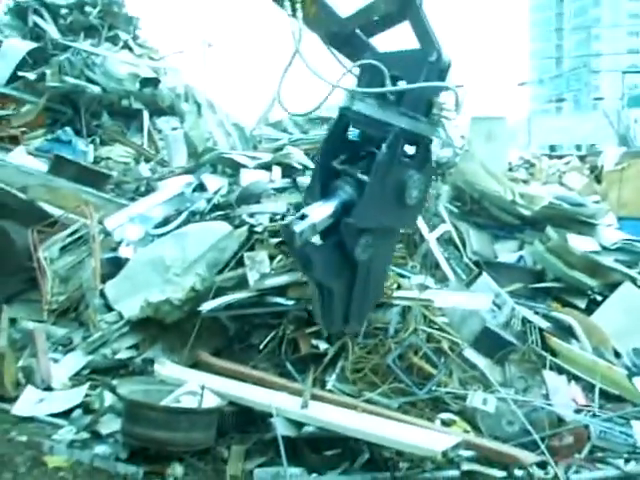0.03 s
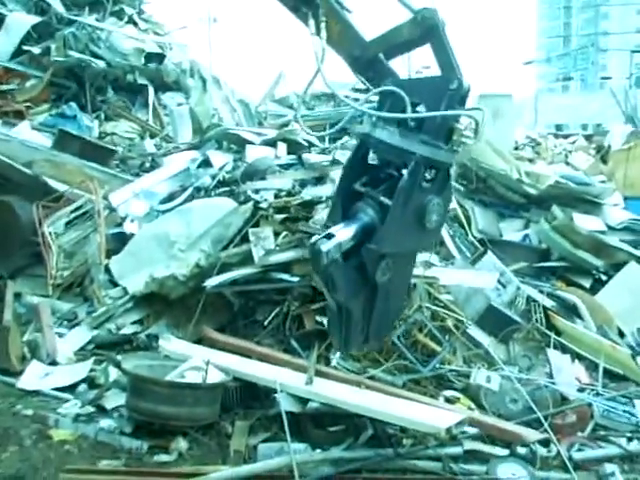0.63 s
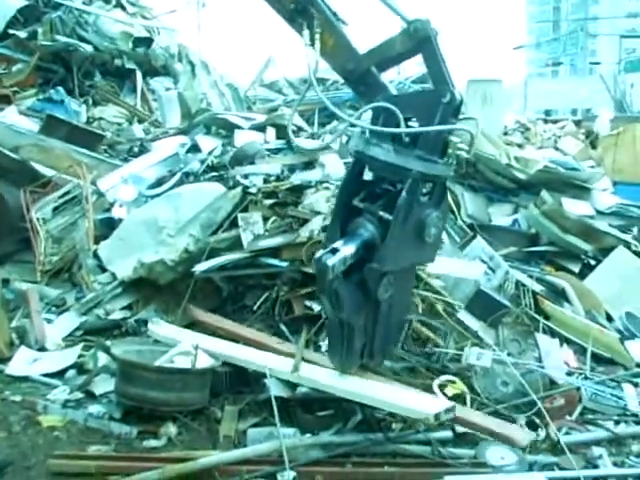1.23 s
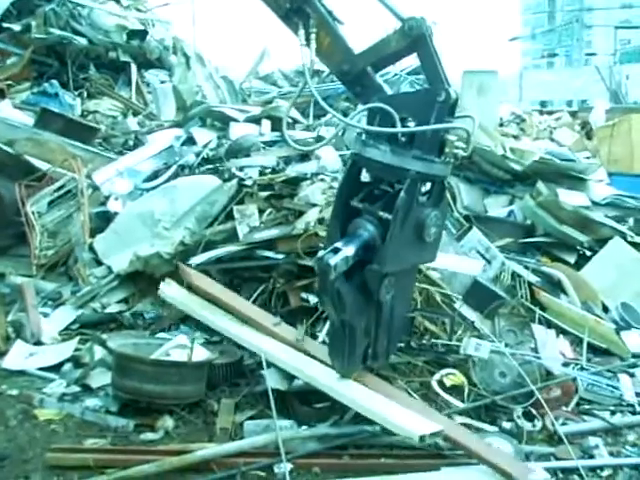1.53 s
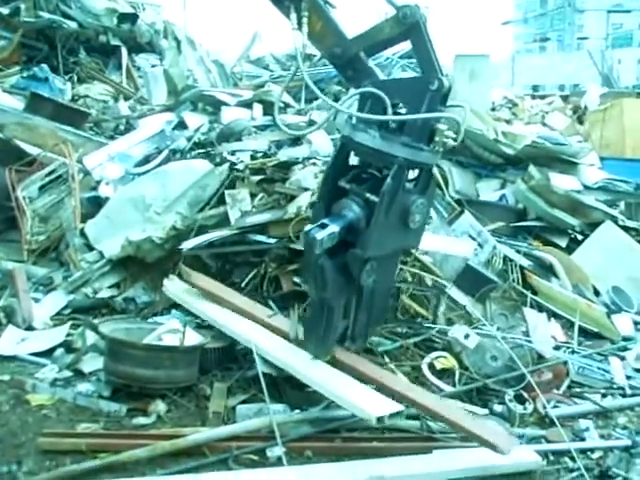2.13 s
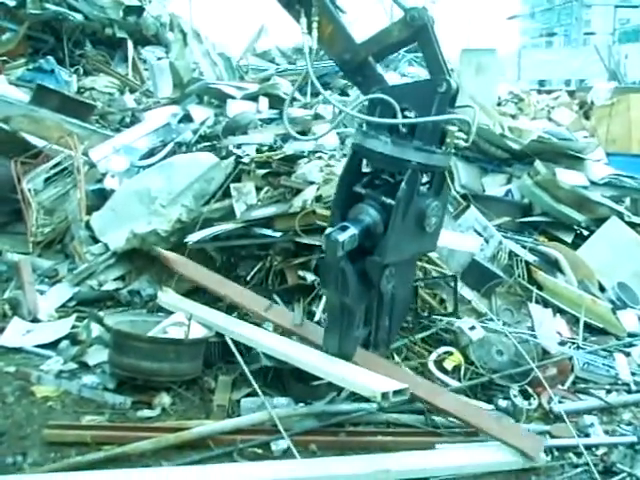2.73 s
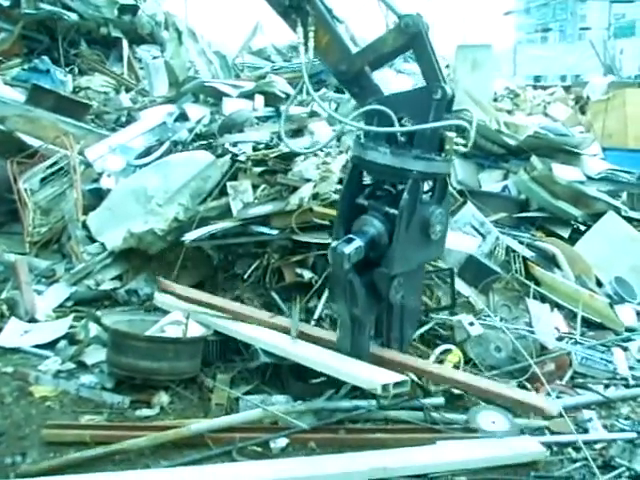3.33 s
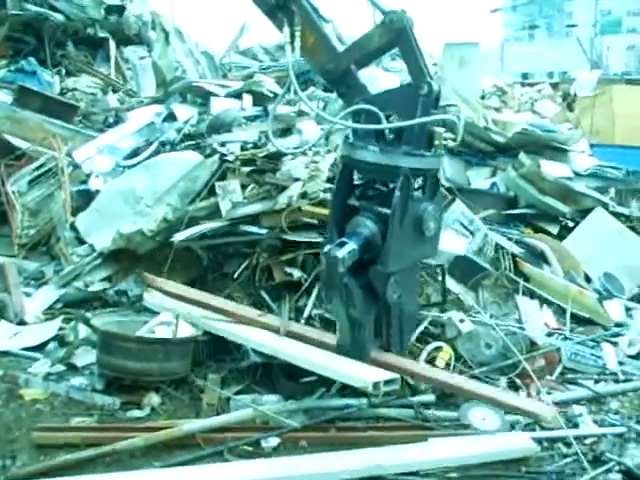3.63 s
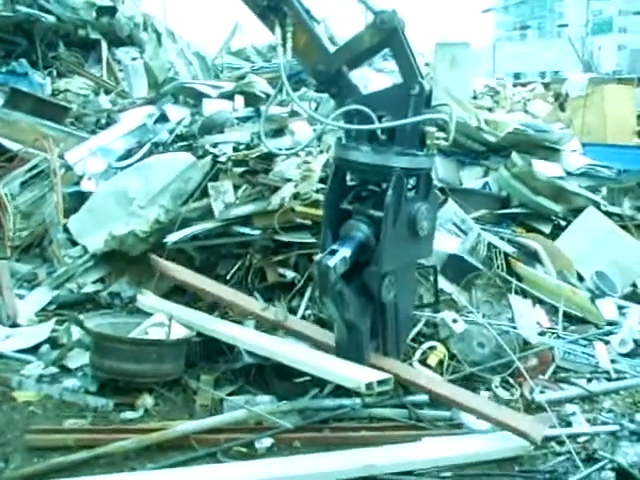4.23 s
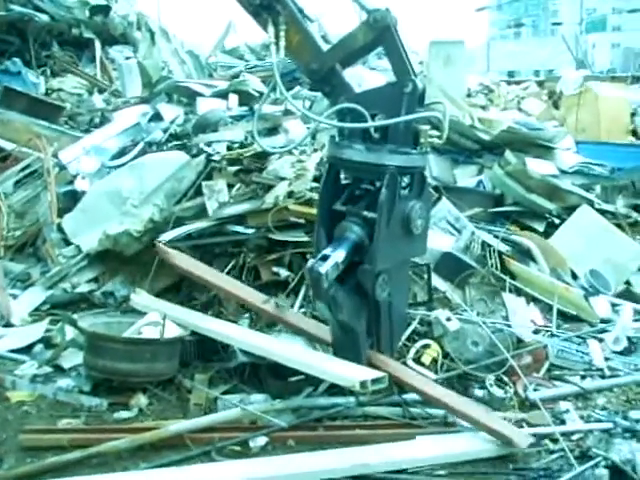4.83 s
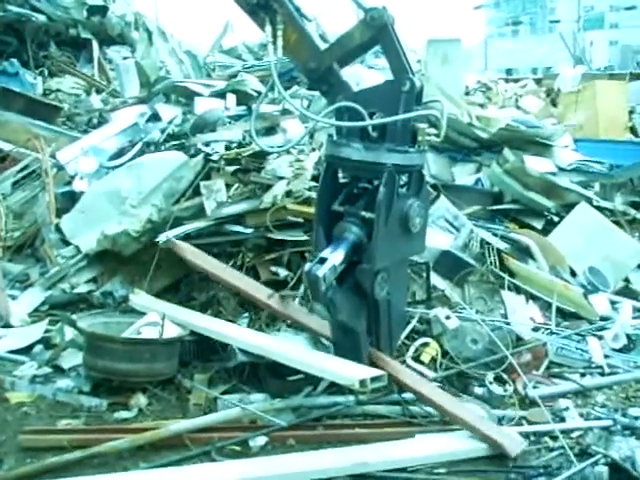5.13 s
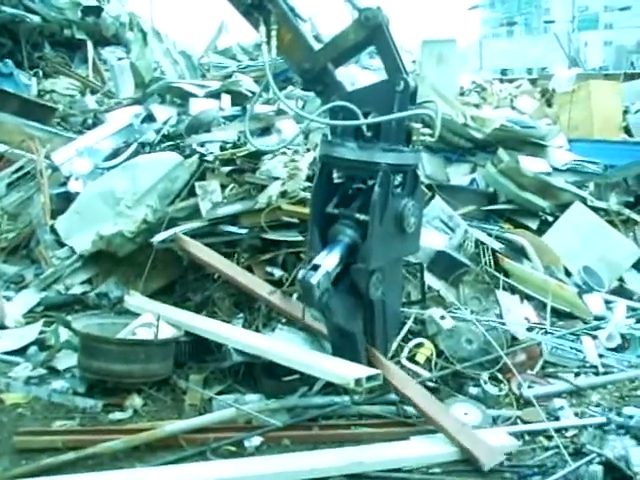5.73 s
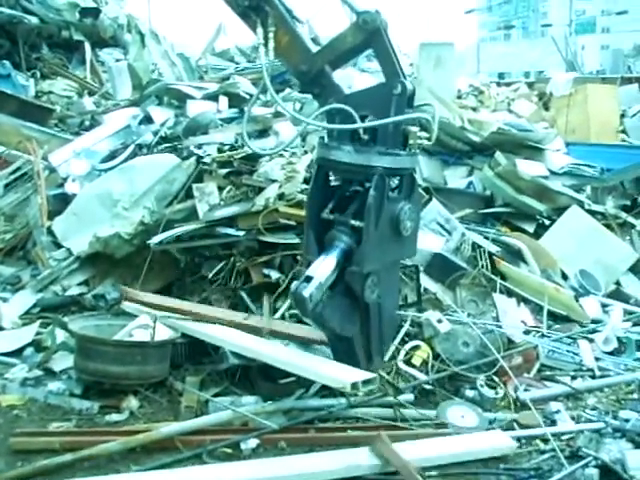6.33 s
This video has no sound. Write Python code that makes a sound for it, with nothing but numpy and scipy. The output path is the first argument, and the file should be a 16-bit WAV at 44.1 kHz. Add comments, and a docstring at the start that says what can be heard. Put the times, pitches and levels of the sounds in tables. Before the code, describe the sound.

An excavator's diesel engine runs steadily in a scrap yard while its hydraulic shear roots through a heap of steel. The pump whines as small pieces scrape and clank, then a hollow tube chatters and rings. The clatter eases and the hydraulics sing through a long squeeze, with light wind buffeting the microphone. Heavy steel bars crash and ring near the end, slightly overloading the recording.

```python
"""An excavator's hydraulic shear roots through scrap steel while its diesel engine runs throughout.
First the pump whines, small pieces scrape and clank, and a light steel channel crashes at 1.1 s.
From 2.7 s a hollow tube chatters and rings. After 3 s wind starts to buffet the microphone, and oil
sings in the valves during one long squeeze. Tube and channel crash at 5.4 s, and a long beam joins them
at 6 s. The microphone misses the highest treble and overloads on the heavy crashes."""
import sys
import numpy as np
from scipy import signal
from scipy.fft import rfft, irfft, next_fast_len
from scipy.io import wavfile

SR = 44100
rng = np.random.default_rng(int(sys.argv[2]) if len(sys.argv) > 2 else 0)


def to_wav(s):
    """Save 16-bit WAV."""
    ch = np.atleast_2d(s).T  # columns
    pcm = np.round(np.clip(ch, -1, 1) * 32767)  # PCM
    wavfile.write(sys.argv[1], SR, pcm.astype(np.int16))


N = 289737
TIME = np.arange(N) / SR
HIT_TIME = np.arange(SR * 2 // 3) / SR  # seconds since a hit began
MIC_EDGE_HZ = 6270  # the microphone picks up little above this

# How fast the engine runs. Each row: time in seconds, firings per second.
FIRING_RATE = [(0, 98.3), (0.3, 92.24), (0.9, 92.54), (1.5, 93.5), (2.3, 95.9), (2.85, 92.7), (3.1, 93.6),
               (3.3, 99), (3.7, 97.3), (4.2, 101.3), (5.3, 98.5), (6.57, 95.4)]
# The tones of the exhaust. Each row: multiple of the firing rate, relative level in dB.
EXHAUST_TONES = [(1, 0), (2, -16), (3, -19.5), (4, -15), (5, -16), (6, -17), (7, -24.5), (8, -18),
                 (9, -19.5), (10, -17)]
# The roar of fan and machine. Each row: frequency in Hz, relative level in dB.
ROAR_COLOUR = [(25, -12.5), (60, 0), (130, -6), (210, 2), (330, -1.5), (520, -5.5), (850, -4), (1500, -8),
               (2200, -7), (3200, -14), (4500, -22), (6200, -20)]
# The tones of the pump, then of the valves: multiples of the firing rate, and their relative levels in dB.
PUMP_MULTIPLES = [4, 5, 7]
PUMP_LEVELS = [-3, -6, 3]
VALVE_MULTIPLES = [20, 21, 22]
VALVE_LEVELS = [0.5, -3.5, -1.5]
# Gusts of wind. Each row: time of the peak in seconds, level in dB, half-width in seconds.
GUSTS = [(3.761, -28, 0.027), (3.97, -29, 0.033), (4.38, -31.5, 0.078), (4.729, -33, 0.089),
         (5.93, -26, 0.063)]
# Pulls of the jaws. Each row: start and length in seconds, relative scrape and rumble levels in dB.
JAW_PULLS = [(.87, 0.38, -24, -39), (1.027, 0.74, -24, -24.5), (1.897, 0.31, -20.5, -22),
             (2.21, 0.41, -24.5, -20), (2.563, 0.42, -20, -33), (3.01, 0.3, -19.5, -22),
             (3.616, 0.47, -29, -30.5), (5.545, 0.46, -30.5, -52), (6.178, 0.3, -15, -28)]
# Steel scraping, then steel striking steel. Each row: frequency in Hz, relative level in dB.
SCRAPE_COLOUR = [(60, -12), (300, -5.5), (700, 1.5), (1600, -3), (2200, 3), (3200, 4), (4600, 1),
                 (6200, -1.5)]
STRIKE_COLOUR = [(60, -15), (250, -21.5), (600, -6), (1600, -4), (2200, 0), (3200, 2), (4600, 2), (5400, 3),
                 (6200, -1.5)]
# Loose scrap knocked about. Each row: start in seconds, relative crack and body levels in dB, rattle
# fade time in seconds, pitch in Hz (200 or less means none). A fade time, or t60, is the time to fall 60 dB.
CLANKS = [(0.13, -18, -17.5, 0.21, -4), (0.1575, -4, -23, 0.029, 4673), (0.374, -18.5, -17.5, 0.093, 0),
          (.581, -21, -23, .3, 3391), (0.669, -23.5, -41, 0.28, 0), (1.228, -13.5, -8.5, 0.042, 1148),
          (1.317, -15, -39, 0.17, 5), (1.3735, -13.5, -48, 0.24, -1.5), (1.4135, -7.5, -34, 0.67, 0),
          (1.5, -9, -32, 0.18, -14), (1.592, -10.5, -24, .055, 0), (1.69, -38, -13, 0.2, -4),
          (1.8565, -5, -27, 0.09, 2), (1.9169, -8, -22.5, 1, 3591), (2.0845, -10, -7.5, 0.041, 2032),
          (2.258, -16, -7, 0.12, 0), (2.4343, -16.5, -11, 0.13, 0), (2.935, -10.5, -42, 0.41, 2),
          (3.7868, -18, -45, 0.088, -2), (3.8561, -10.5, -19.5, 0.49, 0), (4.001, -25.5, -13, 0.27, -3),
          (4.1156, -41, -15, 0.45, 0), (4.406, -46, -17, .03, 387), (4.4902, -23, -22, .12, 7),
          (4.9664, -22, -31, 0.74, 0), (5.379, -10.5, -31, 0.8, 2043), (5.5533, -11, -12, .15, 0),
          (5.7111, -17, -38, 0.87, 4), (5.883, -14, -9.5, 0.32, 10)]
# The ringing tones (modes) of three steel bars. Each row: frequency in Hz, relative level in dB.
TUBE = [(861.3, -27), (936.7, -44), (1028, -25), (1152, -23), (1367, -37), (1421, -29), (1674, -34),
        (1707, -29), (2116, -22), (2191, -31.5), (2815, -24), (2966, -26), (3677, -36)]
BEAM = [(412, -24), (532.9, -24), (732.1, -15.5), (1077, -22.5), (1202, -17), (1254, -27), (1464, -46),
        (1513, -17.5), (1599, -23), (1728, -25), (1933, -19), (2078, -19.5), (2918, -20), (3203, -25.5),
        (3871, -21.5)]
CHANNEL = [(1007, 1.5), (1152, 1), (1343, 5.5), (2304, -7.5)]
# The bars by name. Each row: tones, their fade time in seconds at 700 Hz, pitch of the walls in Hz,
# thud in dB relative to the clash, low clang in dB relative to the body.
BARS = {"tube": (TUBE, 0.22, 953, -3.5, -13.5), "beam": (BEAM, 0.33, 1040, -0.13, -13),
        "channel": (CHANNEL, 0.58, 1138, -18.5, -11)}
# Bars crashing on the heap. Each row: start in seconds, clash and body levels in dB,
# chatter fade time in seconds, ring level in dB, name of the bar.
CRASHES = [(0, -12.5, -38, 0.043, -25, "beam"), (1.103, -18.5, -15, 0.28, -17, "channel"),
           (2.665, -9.5, -7.5, 0.32, -29, "tube"), (2.759, -16, -9.5, 0.15, -14, "tube"),
           (2.825, -11, -11.5, 0.27, -18, "tube"), (3.051, -7.5, -10.5, 0.41, -11.5, "tube"),
           (3.168, -33, -13.5, 0.58, -14.5, "tube"), (3.373, -19, -20, 0.51, -23.5, "tube"),
           (3.479, -15, -39, 0.24, -34, "tube"), (5.389, -18, -30, 0.64, -43, "tube"),
           (5.422, -7, -17.5, 0.3, -34, "channel"), (6.043, -8.5, -13.5, 0.8, -14.5, "beam"),
           (6.18, -16, -9.5, 0.82, -11, "beam"), (6.349, -7.5, -9.5, 0.1, -20, "channel"),
           (6.42, -12.5, -11, 0.11, -12, "tube"), (6.527, -18.5, -19, 0.39, -25, "tube")]


def amp(db):
    """Turns decibels into a number to multiply by."""
    return 10 ** (np.asarray(db) / 20)


def evened(x):
    """Scales a signal to an average (rms) strength of 1."""
    return x / np.sqrt(np.mean(x ** 2) + 1e-20)


def sized(x, force, db):
    """Gives a sound the energy of its blow, shifted by db."""
    return amp(db) * evened(x) * np.sqrt(np.mean(force ** 2))


def add(mix, start, sound):
    """Mixes a sound in at a start time in seconds."""
    part = mix[max(round(start * SR), 0):][:len(sound)]
    part += sound[:len(part)]


def colour(x, points):
    """Shapes bass and treble along (Hz, dB) points, within the microphone's range."""
    size = next_fast_len(len(x) + 4096)
    hz = np.fft.rfftfreq(size, 1 / SR)
    point_hz, point_db = np.transpose(points)
    gain = amp(np.interp(np.log(hz + 1), np.log(point_hz), point_db)) * (hz < 1.1 * MIC_EDGE_HZ)
    return irfft(rfft(x, size) * gain, size)[:len(x)]


def low_pass(x, hz):
    """Steeply cuts the treble above hz."""
    return signal.oaconvolve(x, signal.firwin(601, hz, window=("kaiser", 9), fs=SR)[None], "same")


def wander(per_s, size=N):
    """A random drift that heads for a new value per_s times a second."""
    values = rng.standard_normal(4096)
    return evened(np.interp(TIME[:size] * per_s, np.arange(len(values)), values))


def swell(start, length, rise_s, release_s):
    """Rises, holds until length has passed, then dies away."""
    t = TIME - start
    return np.clip(t / rise_s, 0, 1) * np.exp(-np.maximum(t - length, 0) / release_s)


def engine(hum_db=-27.5, roar_db=-31, throb=0.27, overtone_db=-2):
    """The diesel's exhaust hums, its hydraulics whine, and its roar throbs with each firing."""
    firing_hz = np.interp(TIME, *np.transpose(FIRING_RATE))
    phase = 2 * np.pi * np.cumsum(firing_hz) / SR
    hum = np.sin(phase) * (1 + 0.02 * wander(3.1))
    for multiple, db in EXHAUST_TONES[1:]:
        overtone = np.sin(multiple * phase + 2 * np.pi * rng.random())
        hum += amp(db + overtone_db) * overtone * (1 + 0.19 * wander(15))
    whine = hydraulics(phase, firing_hz)
    roar = evened(colour(rng.standard_normal(N), ROAR_COLOUR))
    roar = roar * (1 + throb * np.sin(phase)) * amp(0.12 * wander(20))
    return np.sqrt(2) * (amp(hum_db) * hum + whine) + amp(roar_db) * roar


def oil_ripple(phase, multiples, levels_db, rough):
    """The oil pressure ripples in step with the engine, making a few rough tones."""
    return sum(amp(db) * np.sin(k * phase + rough * wander(60)) * (1 + 0.22 * wander(30))
               for k, db in zip(multiples, levels_db))


def hydraulics(phase, firing_hz, pump_db=-37, valve_db=-44, loaded_hz=92.7, fade_db_per_hz=2.0):
    """The pump whines as its load slows the engine; the valves sing while the jaws squeeze."""
    load = amp(pump_db - fade_db_per_hz * np.maximum(firing_hz - loaded_hz, 0))
    squeeze = amp(valve_db) * swell(start=3.55, length=2.1, rise_s=0.23, release_s=0.23)
    whine = load * oil_ripple(phase, PUMP_MULTIPLES, PUMP_LEVELS, rough=0.2)
    return whine + squeeze * oil_ripple(phase, VALVE_MULTIPLES, VALVE_LEVELS, rough=0.52)


def wind(breeze_db=-38.5, start_s=3.03, rise_s=0.75):
    """Air buffets the microphone: a light breeze gets up and stays, with a few gusts on top."""
    wind_colour = [(18, 0.5), (50, 3.5), (160, 6.5), (300, 1.0), (550, -26.5), (1200, -62.5)]
    rumble = colour(rng.standard_normal(N), wind_colour)
    breeze = amp(breeze_db) * np.clip((TIME - start_s) / rise_s, 0, 1)
    gusts = sum(amp(db) * np.exp(-((TIME - peak) / width) ** 2) for peak, db, width in GUSTS)
    return evened(rumble) * (breeze + gusts) * amp(0.33 * wander(28))


def contacts(n, per_s, spread_db):
    """A stream of tiny random impacts, a few of them harder than the rest."""
    strength = amp(spread_db * np.minimum(rng.exponential(1, n), 3))
    return evened(strength * rng.choice([-1, 1], n) * (rng.random(n) < per_s / SR))


def piece_ring(drive, low_hz, high_hz, t60):
    """The impacts in drive make a crumpled piece of steel ring with countless crowded tones."""
    t = HIT_TIME[:SR // 4]
    hz = np.fft.rfftfreq(len(t), 1 / SR)
    tones = irfft(np.exp(2j * np.pi * rng.random(len(hz))) * (hz > low_hz) * (hz < high_hz), len(t))
    ring = tones * amp(-60 * t / t60)
    return signal.fftconvolve(drive, ring / np.linalg.norm(ring))[:len(drive)]


def jangle(drive, t60, ring_db):
    """Impacts are heard directly and through the high ring of the piece they hit."""
    return drive + amp(ring_db) * piece_ring(drive, 1400, MIC_EDGE_HZ, t60)


def hollow(drive, hz, spread, t60, ring_db):
    """The walls of hollow steel ring in a band around hz."""
    rung = drive + amp(ring_db) * piece_ring(drive, hz / 2, hz * 2, t60)
    band = signal.butter(3, [hz / spread, hz * spread], "band", fs=SR, output="sos")
    return signal.sosfilt(band, rung)


def bar_ring(drive, tones, t60):
    """A struck bar rings with its own tones; t60 holds at 700 Hz and higher tones die sooner."""
    out = np.zeros(len(drive))
    for hz, db in tones:
        decay = amp(-60 * (hz / 700) / (t60 * SR))
        feedback = [1, -2 * decay * np.cos(2 * np.pi * hz / SR), decay * decay]
        out += amp(db) * evened(signal.lfilter([1, 0, -1], feedback, drive))
    return out


def pulling(rest_scrape_db=-34, rest_rumble_db=-36.5, ease_db_per_s=8.5):
    """How hard the heap scrapes and rumbles: never quite still, and louder while the jaws pull."""
    scraping, rumbling = np.full(N, amp(rest_scrape_db)), np.full(N, amp(rest_rumble_db))
    for start, length, scrape_db, rumble_db in JAW_PULLS:
        giving_way = amp(-ease_db_per_s * np.maximum(TIME - start, 0))
        pull = swell(start, length, rise_s=0.024, release_s=0.053) * giving_way
        scraping = np.hypot(scraping, amp(scrape_db) * pull)
        rumbling = np.hypot(rumbling, amp(rumble_db) * pull)
    return scraping, rumbling


def dragging(scraping, rumbling, scrape_db=-2, rumble_db=-4, groan_db=-11, jerk_db=2):
    """Wire and sheet slip in jerks over small pieces; larger ones rumble and the heap groans."""
    jerks = amp(jerk_db * wander(41))
    slips = sum(jangle(contacts(N, 650, 5.4), t60=0.16, ring_db=-2) for _ in range(2))
    scrape = amp(scrape_db) * evened(colour(slips, SCRAPE_COLOUR))
    shoves = contacts(N, per_s=1200, spread_db=3.2)
    rumble = amp(rumble_db) * evened(hollow(shoves, 994, spread=1.326, t60=0.064, ring_db=-3.5))
    groan = amp(groan_db) * evened(hollow(shoves, 365, spread=1.193, t60=0.32, ring_db=8))
    return jerks * (scrape * scraping + (rumble + groan) * rumbling)


def clank(crack_db, body_db, t60, hz=0, bounce_db=-11, pitch_t60=0.11):
    """A piece hits with a crack and rattles to rest, stirring its hollow body and the tube."""
    t = HIT_TIME[:len(HIT_TIME) // 2]
    snap = np.exp(-t / 0.008)
    build_up = 1 - np.exp(-t / 0.005)
    settle = amp(-60 * t / t60)
    force = snap + amp(bounce_db) * settle
    crack = colour(jangle(force * contacts(len(t), 7000, 5.6), t60=0.024, ring_db=-1.4), STRIKE_COLOUR)
    rattle = settle * build_up * contacts(len(t), per_s=4000, spread_db=2.2)
    body = hollow(rattle, 990, spread=1.46, t60=0.052, ring_db=-11.5)
    sound = sized(crack, force, crack_db - 3) + sized(body, settle, body_db - 6)
    sound += sized(bar_ring(rattle, TUBE, t60=0.13), settle, body_db - 11)
    if hz > 200:  # some pieces also ring with a buzzing pitch
        phase = 2 * np.pi * hz * t + 0.9 * wander(320, size=len(t))
        sound += amp(max(crack_db, body_db) - 3.5 - 60 * t / pitch_t60) * np.sin(phase)
    return sound


def loose_scrap(scraping, strays_per_s=6, stray_db=1.5, spread_db=2.5):
    """Loose pieces clank loudly; stray bits tick at random, louder while the jaws pull."""
    out = np.zeros(N)
    for start, *blow in CLANKS:
        add(out, start, clank(*blow))
    draws = rng.random((128, 3))
    for when, size, chance in draws:
        if chance < strays_per_s * TIME[-1] / len(draws):
            db = stray_db + spread_db * (2 * size - 1) + 20 * np.log10(scraping[int(when * N)])
            add(out, when * TIME[-1], clank(db, body_db=db - 10, t60=0.15))
    return out


def crashes(blow_s=0.01, hold_share=0.096):
    """A bar lands with a blow and a thud, chatters against the heap, then settles as its tones ring on."""
    out, n = np.zeros(N), len(HIT_TIME)
    blow = np.exp(-HIT_TIME / blow_s)
    for start, clash_db, body_db, t60, ring_db, name in CRASHES:
        tones, tones_t60, wall_hz, thud_db, clang_db = BARS[name]
        flutter_db = 2.2 * wander(110, size=n)
        # The chatter keeps its full force for a share of its fade time.
        force = amp(flutter_db - 60 * np.maximum(HIT_TIME / t60 - hold_share, 0))
        chatter = force * contacts(n, per_s=4500, spread_db=3.36)
        landing = blow * contacts(n, per_s=8000, spread_db=2.4)
        hits = chatter + landing
        clash = sized(colour(jangle(hits, t60=0.044, ring_db=-7.5), STRIKE_COLOUR), force, clash_db)
        body = sized(hollow(hits, wall_hz, spread=1.25, t60=0.14, ring_db=1.5), force, body_db)
        clang = sized(hollow(hits, 470, spread=2.3, t60=0.23, ring_db=3.5), force, body_db + clang_db)
        thud = sized(hollow(landing, 380, spread=6, t60=0.2, ring_db=-11), blow, clash_db + thud_db)
        ring = sized(bar_ring(hits, tones, tones_t60), force, ring_db)
        add(out, start, clash + body + clang + thud + ring)
    return out


def yard_echo(x, t60=0.16, echo_db=-12, rise_s=0.029):
    """The heaps scatter the sound back as a short, blurred echo."""
    reflections = contacts(len(HIT_TIME), per_s=2000, spread_db=0.8)
    tail = reflections * amp(-60 * HIT_TIME / t60) * (1 - np.exp(-HIT_TIME / rise_s))
    return x + amp(echo_db) * signal.fftconvolve(x, tail / np.linalg.norm(tail))[:N]


def scene():
    """Engine, wind and echoing scrap at one microphone."""
    background = engine() + wind()
    scraping, rumbling = pulling()
    scrap = dragging(scraping, rumbling) + crashes() + loose_scrap(scraping)
    return (background + yard_echo(scrap))[None]


def record(dry, input_limit=0.66, output_limit=0.62, fizz_hz=11000, fizz_db=-10, top_hz=15850):
    """Loud peaks overload softly, the treble is cut, and what still sticks out clips into a dull fizz."""
    squashed = dry / (1 + (dry / input_limit) ** 6) ** (1 / 6)
    clipped = np.clip(low_pass(squashed, MIC_EDGE_HZ), -output_limit, output_limit)
    lower = low_pass(clipped, fizz_hz)
    fizz = clipped - lower
    return low_pass(lower + amp(fizz_db) * fizz, top_hz)


dry = scene()
out = record(dry)
to_wav(out)
```